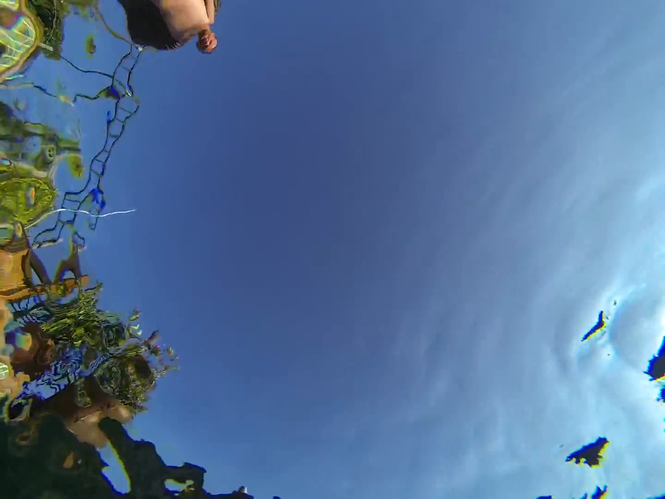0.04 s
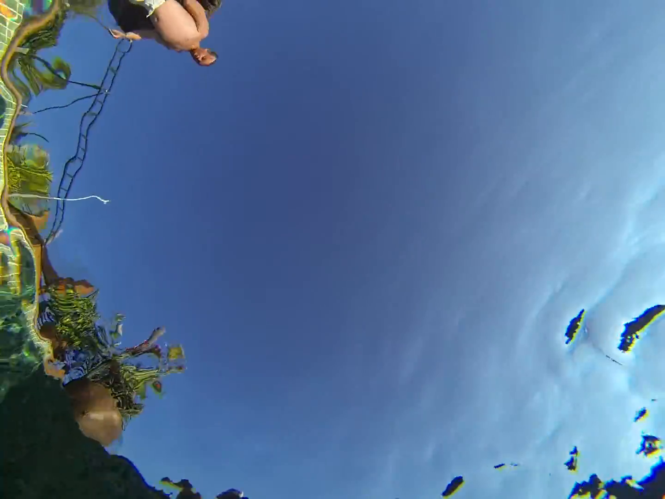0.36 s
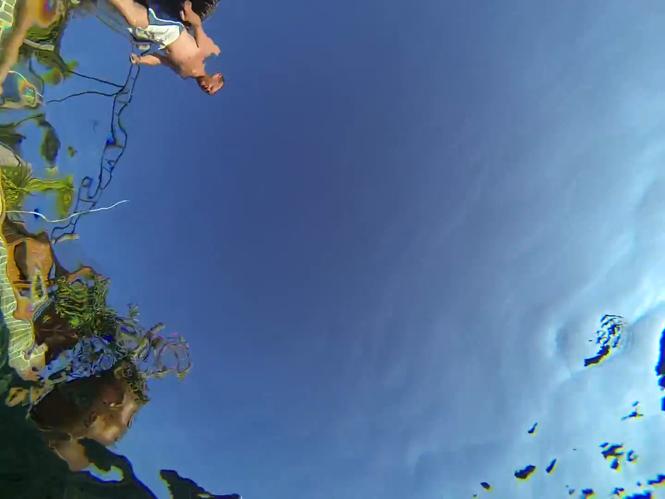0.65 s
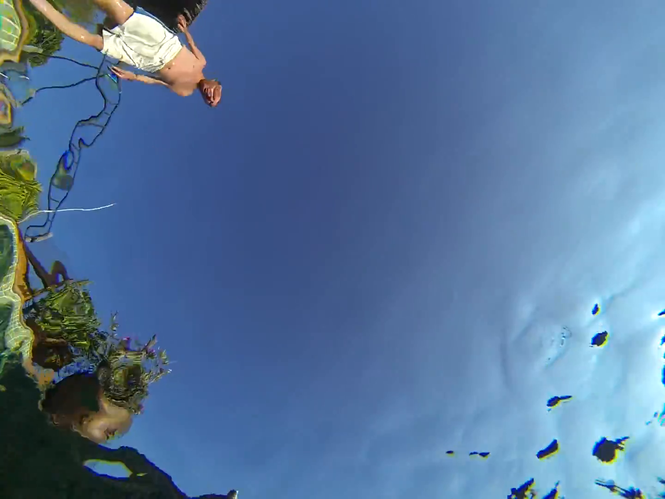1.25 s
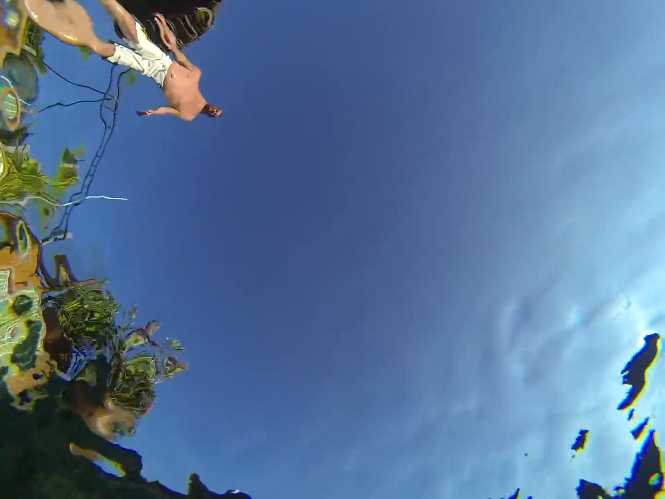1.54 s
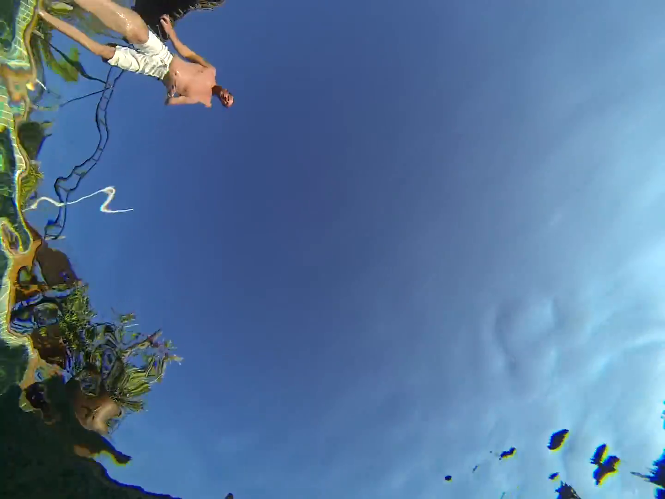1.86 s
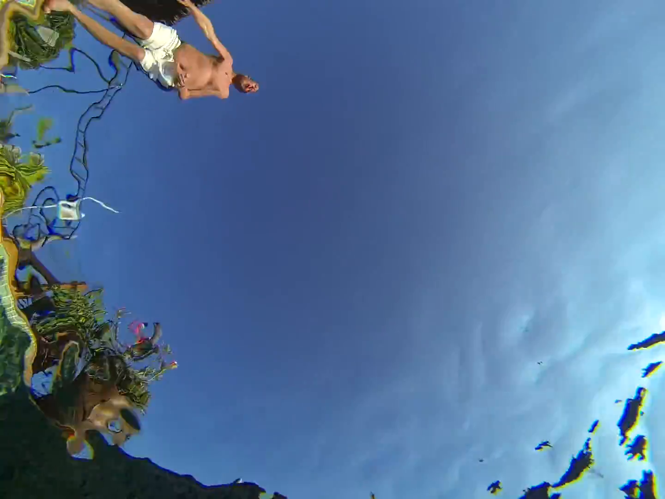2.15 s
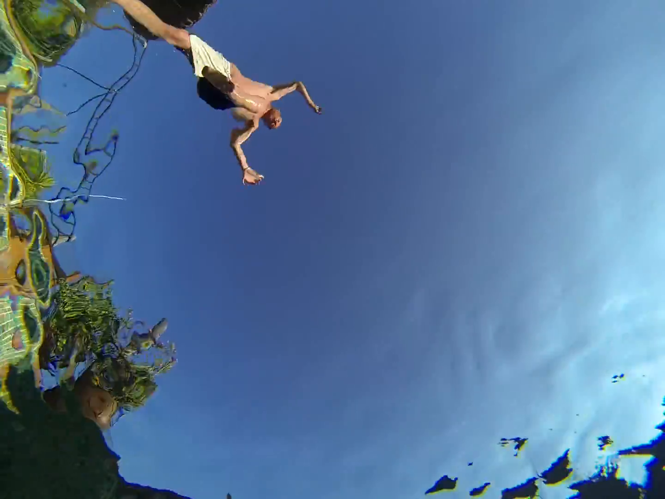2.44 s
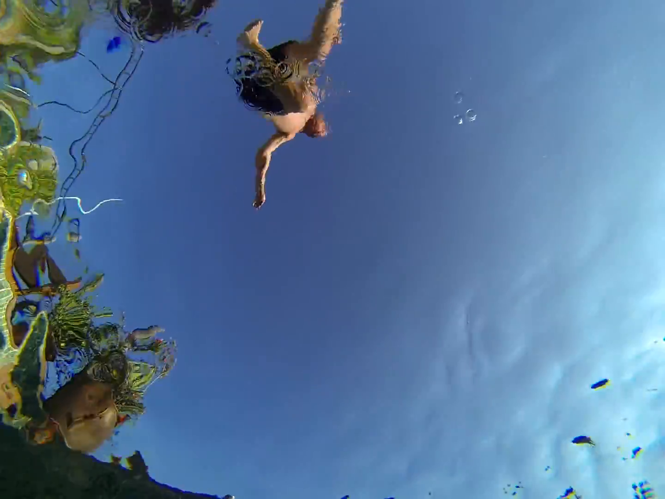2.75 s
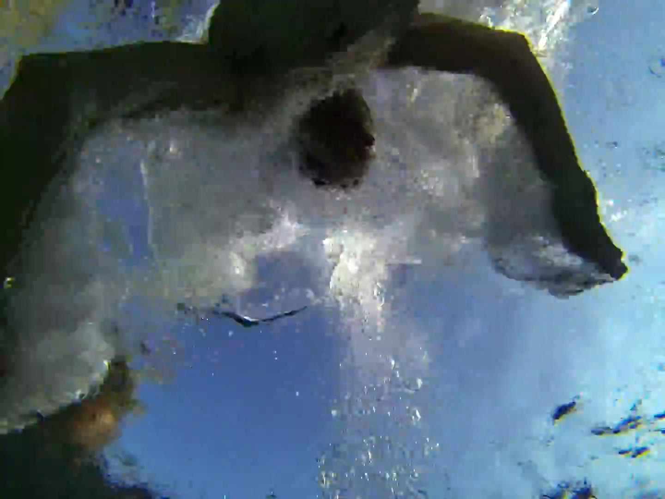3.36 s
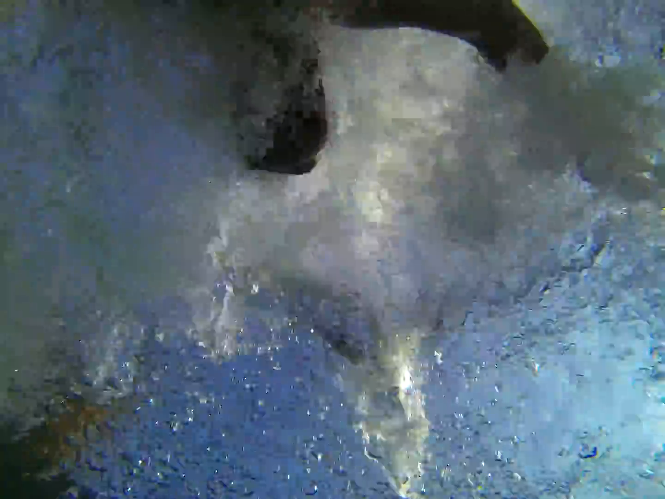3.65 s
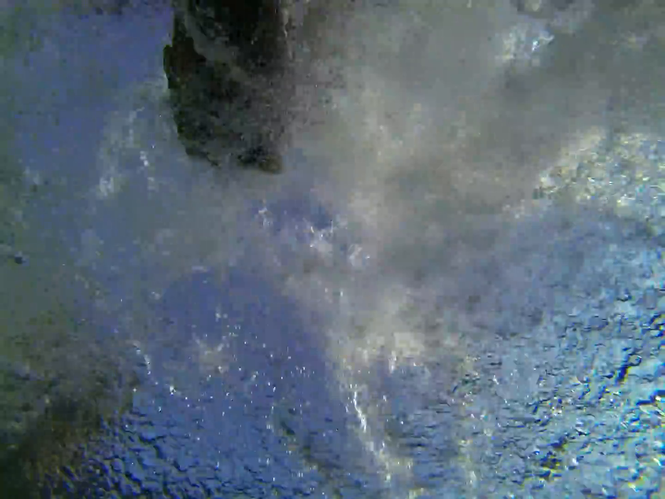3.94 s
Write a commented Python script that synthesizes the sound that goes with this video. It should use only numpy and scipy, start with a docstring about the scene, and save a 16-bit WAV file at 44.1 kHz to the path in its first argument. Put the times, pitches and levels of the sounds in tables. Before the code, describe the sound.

Someone plunges into a pool with a loud splash, after a quiet stretch of pump hum and tiny bubble blips. Thumps, surging water and gurgling bubbles follow, sounding boxy through a submerged microphone in a waterproof case.

```python
"""A dive heard under water

A swimming pool is heard through a camera's waterproof case, which resonates near 445 Hz.
The circulation hums and small bubbles tick; then a diver breaks the surface with a burst of spray.
Air pockets collapse in thumps, the water surges, and a cloud of gurgling, fizzing bubbles drifts
onto the case. Each bubble rings as a damped oscillator: the larger it is, the lower its pitch."""
import sys
import numpy as np
from scipy import signal
from scipy.fft import rfft, irfft
from scipy.io import wavfile
from scipy.ndimage import uniform_filter1d

SR = 44100
rng = np.random.default_rng(int(sys.argv[2]) if len(sys.argv) > 2 else 0)


def output_pcm(signal):
    """Save a mono or channel-first signal as 16-bit PCM at the path in sys.argv[1].

    Samples are clipped to [-1, 1] before scaling.
    """
    pcm = np.clip(np.atleast_2d(signal).T, -1, 1) * 32767
    wavfile.write(sys.argv[1], SR, np.round(pcm).astype(np.int16))


N = 176400
TIME = np.arange(N) / SR
ENTRY_S = 2.886  # the diver meets the surface

# Resonances of the case. Each row: frequency in Hz, width in Hz, lift in dB.
CASE_MODES = [(445.7, 58, 11), (886, 120, 20.5), (998, 96, 6.5), (1245, 190, 6), (1436, 83, 4.5),
              (1650, 180, 5.5), (1965, 190, 7.5), (2350, 110, 4.5), (2750, 42, 6.5), (4050, 380, 8.5),
              (4900, 150, 6.5), (6420, 200, 5)]

# Collapsing air pockets. Each row: time in seconds, suction in dB, push in dB,
# rise of the push in seconds, knock on the case in dB.
POCKET_COLLAPSES = [(2.984, -11, -10.5, 0.0047, -19), (3.033, -5, -10, .005, -9),
                    (3.064, -25, -28, 0.0007, -20.5), (3.139, -34, -8.5, 0.0039, -31),
                    (3.235, -10.5, -4.5, 0.0034, -12), (3.28, -17, -8, 0.0054, -32),
                    (3.308, -24, -17, 0.0019, -19.5), (3.330, -32, -18.5, 0.0017, -25.5),
                    (3.475, -29, -17.5, 0.0019, -9.5), (3.486, -23, -12, .002, -12.5),
                    (3.636, -9, -4.5, 0.00087, -2), (3.656, -26, -12, 0.0012, -22)]
# The bubble cloud. Each row: time in seconds, then fizz, gurgle, drumming and surge in dB.
CLOUD_LEVELS = [(2.885, -54, -50, -34, -20), (2.98, -57, -31.5, -27.5, -27.5), (3.05, -45, -25.5, -44, -42),
                (3.09, -42.5, -41, -31.5, -23), (3.15, -38.5, -37.5, -38.5, -19.5),
                (3.19, -41, -33, -37.5, -26.5), (3.225, -33.5, -30, -25, -27.5), (3.28, -46, -41, -43, -17),
                (3.305, -49.5, -42, -36.5, -20), (3.39, -46, -40.5, -39.5, -29),
                (3.46, -41.5, -32.5, -30, -24), (3.50, -39, -29.5, -33.5, -29.5),
                (3.62, -34, -21.5, -22, -22.5), (3.65, -43, -26, -31.5, -26), (3.71, -43, -27.5, -29, -29),
                (3.78, -37.5, -26, -26.5, -36), (3.86, -31.5, -23.5, -25, -22.5),
                (4.0, -32.5, -24, -28, -33)]
# Bubbles near the case. Each row: start in seconds, peak in dB, frequency in Hz, rise in seconds.
NEAR_BUBBLES = [(3.078, -24.5, 425.7, 0.0094), (3.35, -17.5, 42.3, 0.023), (3.415, -29, 433, .008),
                (3.495, -15.5, 88, .012), (3.55, -19.5, 86, 0.013), (3.665, -12.5, 87, 0.0056),
                (3.848, -28, 1449, 0.0076), (3.857, -21, 79.4, 0.011), (3.89, -29, 1914, 0.005),
                (3.94, -24, 322.5, .012), (3.978, -29, 880, 0.0057)]
# Small bubbles in the quiet pool. Each row: start in seconds, level in dB, frequency in Hz.
LONE_BUBBLES = [(.035, -55, 5330), (.17, -43, 1423), (.387, -49, 2290), (.401, -42, 1760),
                (.409, -56, 6200), (.665, -47, 1970), (.69, -53.5, 2820), (.908, -43, 2440),
                (.931, -52, 3950), (1.159, -43, 1440), (1.263, -53.5, 3980), (1.35, -50, 2390),
                (1.718, -52, 4250), (1.736, -37.5, 1400), (1.9, -53, 3650), (2.084, -44.5, 2190),
                (2.281, -44, 1300)]

# Short transients. Each row: start in seconds, level in dB.
SHARP_CRACKS = [(2.886, -46), (3.032, -27.5), (3.062, -34.5), (3.142, -45), (3.237, -39.5), (3.286, -36.5),
                (3.636, -32.5)]  # at the entry and the strongest collapses
BODY_SLAPS = [(2.886, -33), (2.922, -22.5), (2.931, -22), (2.940, -23.5), (2.958, -22.5), (2.982, -22.5),
              (3.033, -12.5)]
AIR_GULPS = [(2.981, -27), (3.031, -14.5), (3.474, -27), (3.484, -32), (3.635, -21), (3.655, -23),
             (3.660, -25.5)]
WALL_BUMPS = [(1.223, -33.5), (1.432, -40.5), (1.611, -41), (1.771, -39)]
FAINT_TICKS = [(.404, -56), (2.162, -50.5), (2.236, -52.5)]

# Spectral envelopes. Each row: frequency in Hz, relative level in dB.
KNOCK_SPECTRUM = [(30, -19), (120, -2.5), (250, -0.5), (400, -1), (560, -11), (760, -19.5), (1000, -27.5),
                  (1600, -48.5), (4000, -86.5), (15000, -115)]
CRACK_SPECTRUM = [(500, -14.5), (1500, 5), (3000, 3.5), (6500, -8), (8000, -12.5), (15000, -32)]
SPRAY_SPECTRUM = [(250, -6.5), (520, 3), (620, -9.5), (780, -27), (900, -18), (1100, -20.5), (1300, -3.5),
                  (1900, -1.5), (2500, -5.5), (3100, -16.5), (4500, -25), (6600, -24.5), (7200, -33),
                  (9500, -38.5), (15000, -48)]
FIZZ_SPECTRUM = [(400, -10.5), (600, -9.5), (780, -23), (900, -13.5), (1100, -18.5), (1350, -1),
                 (1700, -0.5), (2100, -5.5), (2700, -9), (3300, -16), (4500, -23.5), (5400, -24),
                 (6500, -27), (7600, -34), (15000, -45.5)]
GURGLE_SPECTRUM = [(40, -11), (85, -2), (150, -3.5), (220, -4.5), (300, -3), (450, -11.5), (620, -31.5),
                   (780, -51.5), (1100, -62.5), (3000, -82.5)]
DRUMMING_SPECTRUM = [(150, -28.5), (300, -11), (400, 4.5), (490, -0.5), (620, -13.5), (760, -33.5),
                     (1000, -44), (1500, -61.5), (4000, -84)]
SURGE_SPECTRUM = [(10, -8.5), (22, -5), (42, 3), (65, -1.5), (110, -20.5), (250, -48.5), (1000, -98)]
GULP_SPECTRUM = [(100, -13), (300, 1.5), (560, 1), (750, -13.5), (1050, -7.5), (1400, -15.5), (3000, -49),
                 (15000, -100)]
TICK_SPECTRUM = [(1000, -14), (2200, 8.5), (4000, 0), (6200, -7.5), (9000, -20), (15000, -36)]
RUSH_SPECTRUM = [(20, -6.5), (45, 0.5), (70, -9.5), (140, -16), (185, -9), (235, -5), (295, -19),
                 (380, -13), (490, -11.5), (600, -26), (780, -31.5), (1000, -23), (1100, -24.5),
                 (1320, -12.5), (1700, -18), (2020, -16.5), (2200, -25.5), (2380, -25), (2700, -32),
                 (3500, -36), (4100, -38.5), (4700, -42), (6000, -46.5), (8500, -47), (10100, -49.5),
                 (11500, -56.5), (15000, -50.5)]
PUMP_HISS_SPECTRUM = [(3000, -24.5), (5500, -5), (7500, 1.5), (9000, -5), (10500, -10.5), (15000, -13.5)]

# Slow changes of level. Each row: time in seconds, gain in dB.
DRONE_GAIN = [(0.0, -53.5), (0.17, -54.5), (0.21, -63), (0.31, -52), (0.56, -47), (0.7, -56), (0.86, -45),
              (1.04, -57.5), (1.17, -44), (1.22, -66), (1.31, -45), (1.43, -60.5), (1.46, -47.5),
              (1.63, -56), (2.46, -50), (2.56, -57), (2.63, -45.5), (2.85, -62)]
BACKGROUND_GAIN = [(2.9, 3.5), (3.05, -13), (3.31, -19.5), (4.0, -3)]  # drops away under the splash


def collapses():
    """A collapsing air pocket sucks, then slams shut; the pressure pulse sets the case ringing."""
    suction_s, release_s = 0.013, 0.00063
    out = bursts(SHARP_CRACKS, CRACK_SPECTRUM, decay_s=0.0019)
    t = TIME[:SR // 10]
    knock = colour(signal.unit_impulse(N), KNOCK_SPECTRUM, CASE_MODES[:1])[:len(t)]
    suction = np.concatenate([np.exp(-t[::-1] / suction_s), np.exp(-t / release_s)])
    suction = uniform_filter1d(suction, size=56)
    for s, suction_db, push_db, rise_s, knock_db in POCKET_COLLAPSES:
        add(out, s - len(t) / SR, -from_db(suction_db) * suction)  # builds up ahead of the push
        push = (t / rise_s * np.exp(1 - t / rise_s)) ** 2
        add(out, s, from_db(push_db) * push + from_db(knock_db) * knock / knock.max())
    return out


def spray():
    """Impact tears the surface: the trunk slaps, and drops and bubbles crackle until the water closes."""
    rise_s, end_s, release_s = 0.052, 3.036, 0.0063
    age = np.maximum(TIME - ENTRY_S, 0)
    db = -25 - 10 * np.maximum(1 - age / rise_s, 0) - 40 * np.maximum(age - rise_s, 0)  # rises, then sags
    gate = (age > 0) * np.exp(-np.maximum(TIME - end_s, 0) / release_s)
    drops = crackle(per_s=3000, spread_db=2.0)
    bubbles = swarm(per_s=700, low_hz=1155, high_hz=2870, cycles=22, spread_db=26)
    splash = rms_one(colour(drops + from_db(-16.5) * bubbles, SPRAY_SPECTRUM, CASE_MODES))
    slaps = bursts(BODY_SLAPS, SPRAY_SPECTRUM, CASE_MODES, decay_s=0.0028)
    return from_db(db) * gate * splash + slaps


def bubble_cloud():
    """Entrained air oscillates: it fizzes, gurgles and drums on the case while the water heaves."""
    clicks = crackle(per_s=3500, spread_db=1.0)
    fine = swarm(per_s=700, low_hz=1107, high_hz=3030, cycles=38, spread_db=28)
    large = swarm(per_s=260, low_hz=71.6, high_hz=487, cycles=11, spread_db=13.5)
    fizz = froth(colour(clicks + from_db(-15) * fine, FIZZ_SPECTRUM, CASE_MODES))
    gurgle = colour(large, GURGLE_SPECTRUM)
    drumming = colour(crackle(per_s=700, spread_db=3.0), DRUMMING_SPECTRUM, CASE_MODES)
    surge = colour(rng.standard_normal(N), SURGE_SPECTRUM)
    times, *levels = np.transpose(CLOUD_LEVELS)
    cloud = np.zeros(N)
    for layer, db in zip((fizz, gurgle, drumming, surge), levels):
        cloud += from_db(np.interp(TIME, times, db)) * rms_one(layer)
    return cloud * np.clip((TIME - ENTRY_S) / 0.0037, 0, 1)


def froth(x):
    """Interference with a path of wandering length through moving bubbles keeps shifting the colour."""
    lag_s = 0.000696 * np.exp(0.35 * narrow_noise(hz=0, width_hz=14))
    return x + 0.28 * np.interp(TIME - lag_s, TIME, x)


def glugs():
    """Single bubbles resonate near the case, the largest as deep throbs."""
    out = np.zeros(N)
    for s, db, hz, rise_s in NEAR_BUBBLES:
        add(out, s, from_db(db) * swell(hz, rise_s))
    return out


def gulps():
    """Air pockets break up close to the case; so brief a gulp has a broad spectrum."""
    return bursts(AIR_GULPS, GULP_SPECTRUM, decay_s=0.0042)


def small_sounds():
    """Lone bubbles reverberate by reflection off the pool walls, among faint ticks and dull bumps."""
    echo_db, t60_s = -7.5, 0.08
    out = np.zeros(N)
    for s, db, hz in LONE_BUBBLES:
        add(out, s, from_db(db) * bubble(hz, cycles=82))
    t = TIME[:SR // 5]
    walls = rng.standard_normal(len(t)) * from_db(-60 * t / t60_s)
    out += from_db(echo_db) * signal.fftconvolve(out, walls / np.linalg.norm(walls))[:N]
    for s, db in WALL_BUMPS:  # conducted through the wall
        add(out, s, from_db(db) * swell(hz=87.5, rise_s=0.016))
    return out + bursts(FAINT_TICKS, TICK_SPECTRUM, CASE_MODES, decay_s=0.0092)


def circulation():
    """Flowing water rushes; the pump hums, whines and drives the lowest case resonance into a drone."""
    rush = from_db(-51) * rms_one(colour(rng.standard_normal(N), RUSH_SPECTRUM))
    mains_hz = 100
    hum = from_db(-55.5) * np.sqrt(2) * np.sin(2 * np.pi * mains_hz * TIME)
    drone = narrow_noise(hz=439.4, width_hz=14.2)
    running_rms = np.sqrt(uniform_filter1d(drone ** 2, size=4000))
    drone = drone / running_rms * curve(DRONE_GAIN)
    whine = from_db(-81) * narrow_noise(hz=5120, width_hz=230)
    return curve(BACKGROUND_GAIN) * (rush + hum + drone + whine)


def pump_ticking():
    """Rotation modulates the amplitude of a faint hiss: one puff on every turn of the pump."""
    turn_hz, decay_s = 48, 0.004
    puffs = np.exp(-(TIME % (1 / turn_hz)) / decay_s)
    hiss = colour(rng.standard_normal(N) * puffs, PUMP_HISS_SPECTRUM)
    return curve(BACKGROUND_GAIN) * from_db(-83) * rms_one(hiss)


def bubble(hz, cycles):
    """A damped oscillation whose pitch climbs as it decays by 60 dB."""
    climb = 0.19  # share of the starting pitch
    t = TIME[:int(cycles / hz * SR) + 2]
    age = t * hz / cycles
    return np.sin(2 * np.pi * hz * t * (1 + climb * age / 2)) * np.exp(-np.log(1000) * age)


def swarm(per_s, low_hz, high_hz, cycles, spread_db):
    """Superposition of bubbles of random onset, pitch and strength, at unit rms."""
    out = np.zeros(N)
    draws = np.random.default_rng(rng.integers(2 ** 30)).random((int(per_s * N / SR), 3))
    for when, pitch, faintness in draws:
        hz = low_hz * (high_hz / low_hz) ** pitch
        add(out, when * N / SR, from_db(-spread_db * faintness) * bubble(hz, cycles))
    return rms_one(out - out.mean())


def crackle(per_s, spread_db):
    """Shot noise: independent clicks of uneven size, at unit rms."""
    sizes = from_db(spread_db * np.minimum(rng.exponential(1, N), 4))
    return rms_one((rng.random(N) < per_s / SR) * sizes * rng.choice([-1, 1], N))


def bursts(rows, spectrum, resonances=(), *, decay_s):
    """Exponentially decaying snaps of noise excite a filter."""
    envelope = np.zeros(N)
    for s, db in rows:
        add(envelope, s, from_db(db) * np.exp(-TIME[:SR // 10] / decay_s))
    noise = rng.choice([-1., 1.], N)
    return colour(noise * envelope, spectrum, resonances) / np.std(colour(noise, spectrum, resonances))


def swell(hz, rise_s):
    """An oscillation builds to unit amplitude and is damped away."""
    t = TIME[:SR // 2]
    return t / rise_s * np.exp(1 - t / rise_s) * np.sin(2 * np.pi * hz * t)


def narrow_noise(hz, width_hz):
    """Noise in a narrow band wavers as its components beat; the rms is one."""
    bins = np.arange(N // 2 + 1) * SR / N
    return rms_one(irfft(rfft(rng.standard_normal(N)) / (1 + (2 * (bins - hz) / width_hz) ** 2), N))


def colour(x, spectrum, resonances=()):
    """A minimum-phase filter imposes a smooth spectrum with resonant peaks."""
    size = 2 * N
    hz = np.maximum(np.arange(N + 1) * SR / size, 1)
    points, level = np.transpose(spectrum)
    db = np.interp(np.log(hz), np.log(points), level)
    for centre, width, lift in resonances:
        db += lift / (1 + (2 * (hz - centre) / width) ** 2)
    cepstrum = irfft(np.log(from_db(db)))
    cepstrum[1:N] *= 2  # folding the cepstrum makes the response causal
    cepstrum[N + 1:] = 0
    return irfft(rfft(x, size) * np.exp(rfft(cepstrum)))[:N]


def curve(rows):
    """Gain over time, interpolated in decibels."""
    return from_db(np.interp(TIME, *np.transpose(rows)))


def add(out, start_s, sound):
    """Superpose a sound from a given time."""
    i = min(int(start_s * SR), N)
    out[i:i + len(sound)] += sound[:N - i]


def from_db(db):
    """Decibels to amplitude ratio."""
    return 10 ** (np.asarray(db) / 20)


def rms_one(x):
    """Scale to unit rms."""
    return x / np.sqrt(np.mean(x ** 2) + 1e-20)


def scene():
    """All pressures superpose at one microphone inside the case."""
    background = circulation() + pump_ticking() + small_sounds()
    return (background + spray() + bubble_cloud() + collapses() + gulps() + glugs())[None]


def record(dry):
    """Overload clips any peak beyond full scale; a steep low-pass removes the highest treble."""
    stopband_hz = 16200
    lowpass = signal.cheby2(12, 70, stopband_hz, fs=SR, output="sos")
    return signal.sosfilt(lowpass, np.clip(dry, -1, 1))


dry = scene()
out = record(dry)
output_pcm(out)
```